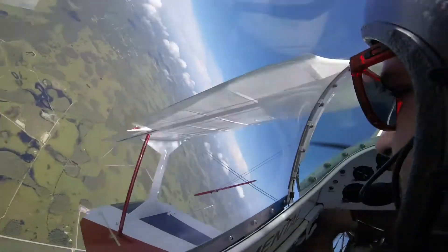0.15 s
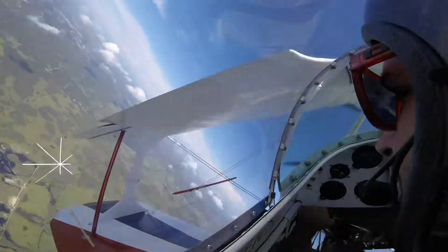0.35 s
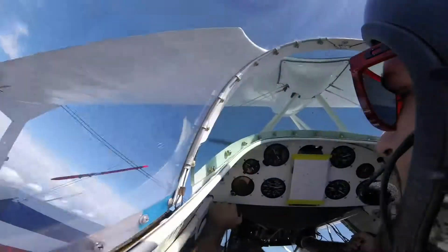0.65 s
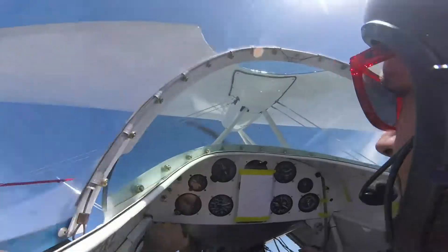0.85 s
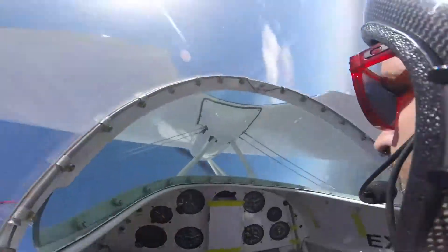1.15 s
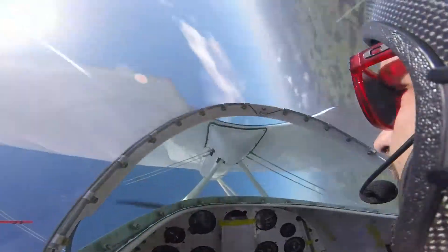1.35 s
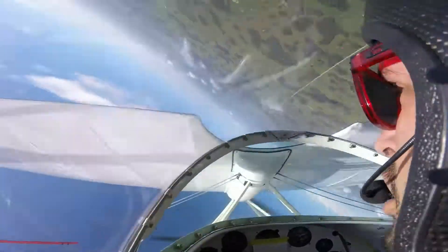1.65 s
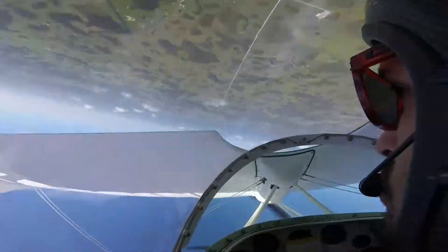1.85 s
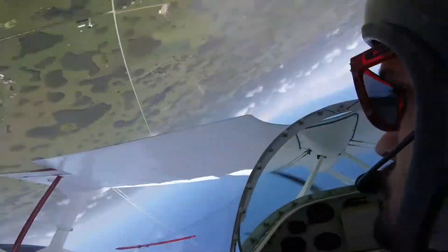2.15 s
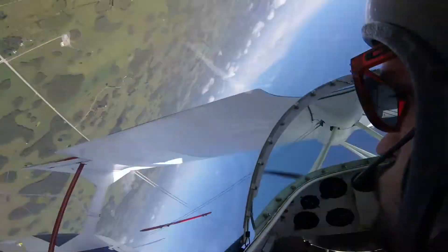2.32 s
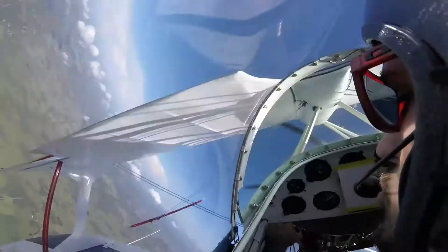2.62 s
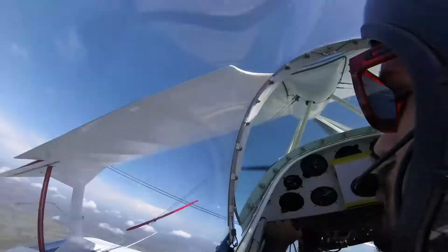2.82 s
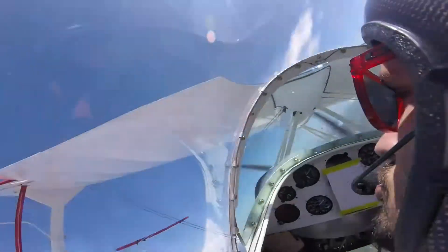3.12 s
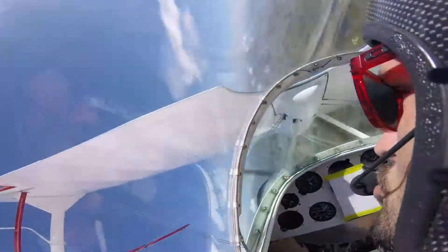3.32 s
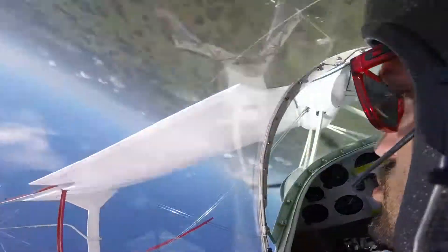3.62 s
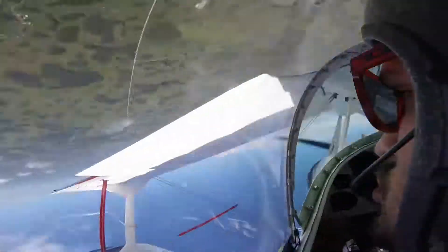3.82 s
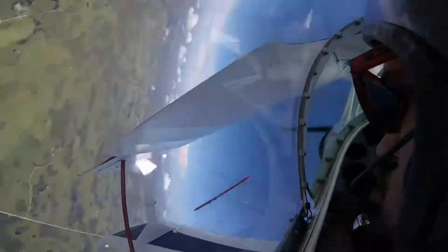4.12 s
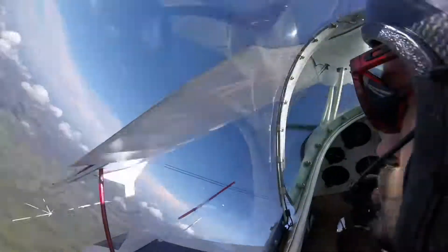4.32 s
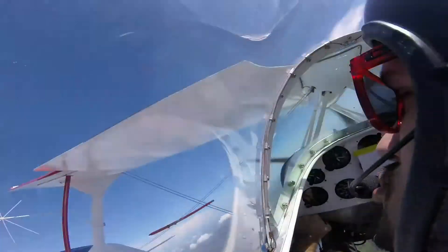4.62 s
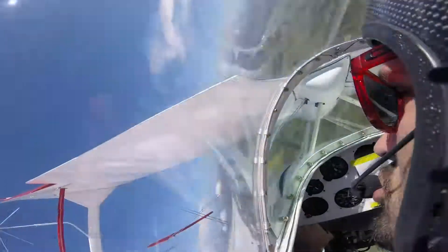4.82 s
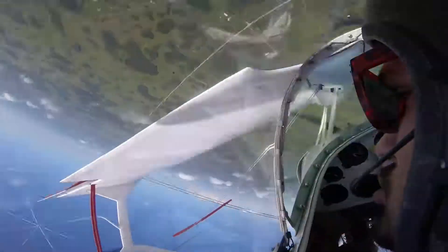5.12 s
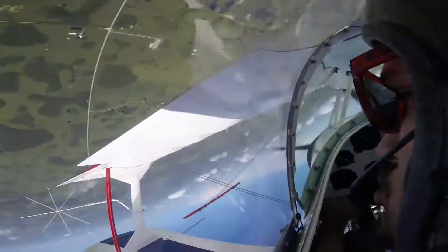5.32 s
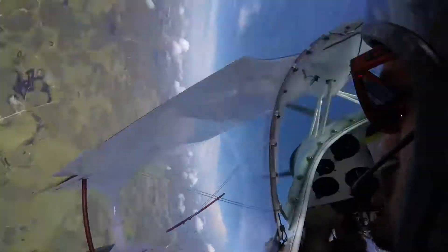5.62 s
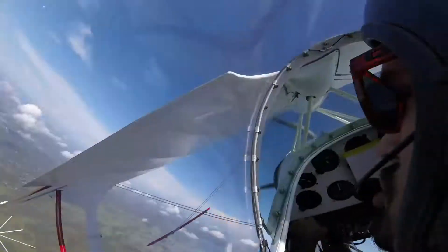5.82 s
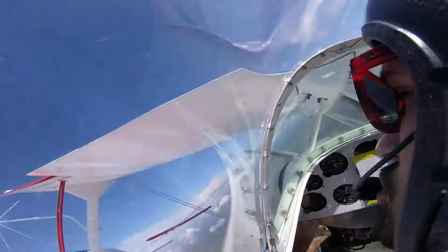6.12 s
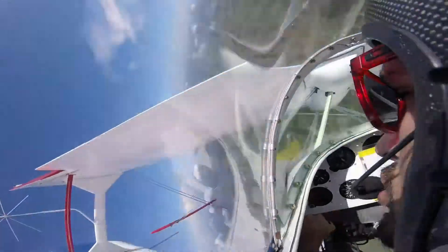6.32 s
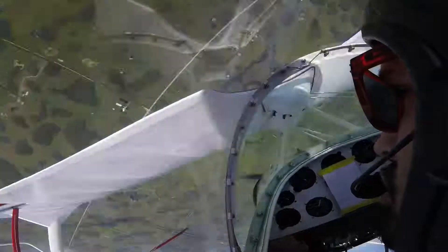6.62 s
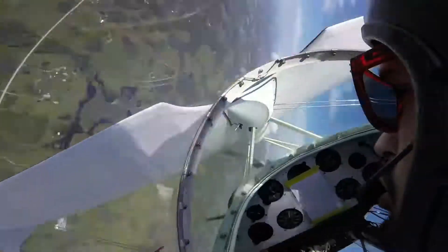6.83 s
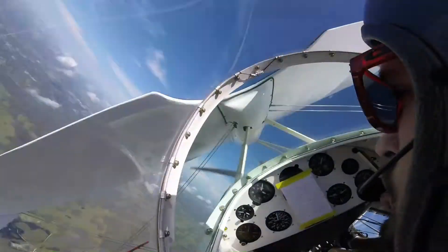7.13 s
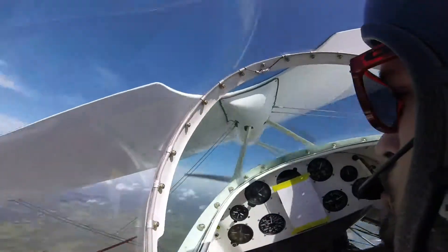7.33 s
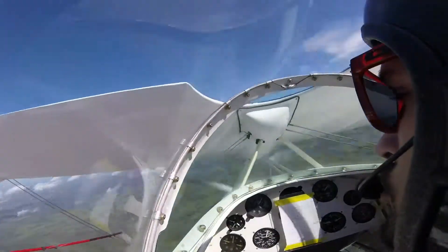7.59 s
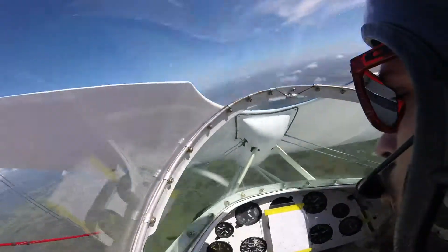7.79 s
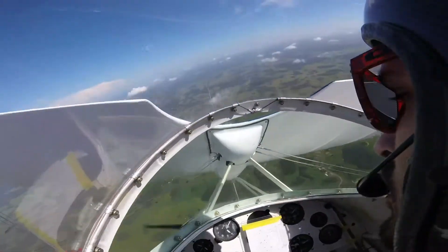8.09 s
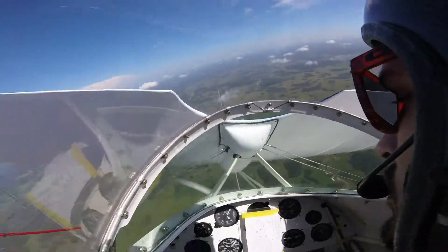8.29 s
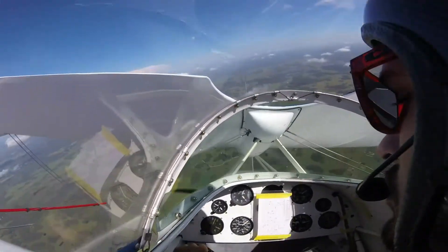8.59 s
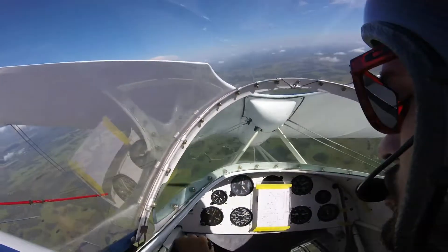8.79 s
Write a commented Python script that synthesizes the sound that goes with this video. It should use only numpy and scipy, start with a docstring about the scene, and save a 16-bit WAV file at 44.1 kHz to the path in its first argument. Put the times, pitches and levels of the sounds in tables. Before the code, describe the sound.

Inside the closed cockpit of an aerobatic aeroplane, a close, throbbing propeller engine drone sits over rushing slipstream and a low turbulence rumble. A brief gap of total silence interrupts it near the start. The engine pitch sinks gradually, swings up and down through the rolls, then rises slightly. Soft airy whistles come and go around the canopy, and its panels ring faintly in the gusts.

```python
"""A four-cylinder engine and its two-blade propeller drone, heard inside the closed cockpit of a small
aerobatic biplane tumbling through rolls. The pitch sags and recovers with the load, and uneven firings
growl in the cabin. Behind them the slipstream rushes over the canopy, rings its panels and whistles in
the gaps, while turbulence rumbles through the airframe. Early on, all sound drops out for a moment."""
import sys
import numpy as np
from scipy import signal
from scipy.fft import rfft, irfft, next_fast_len
from scipy.io import wavfile

SR = 44100
rng = np.random.default_rng(int(sys.argv[2]) if len(sys.argv) > 2 else 0)


def output_pcm(signal):
    """Save a mono or channel-first signal as 16-bit PCM at the path in sys.argv[1].

    Samples are clipped to [-1, 1] before scaling.
    """
    pcm = np.clip(np.atleast_2d(signal).T, -1, 1) * 32767
    wavfile.write(sys.argv[1], SR, np.round(pcm).astype(np.int16))


N = 394694
TIME = np.arange(N) / SR


def from_db(db):
    """Decibels to gain."""
    return 10 ** (np.asarray(db) / 20)


def rms_one(x):
    """Scale to rms 1."""
    return x / np.sqrt(np.mean(x ** 2) + 1e-20)


def in_time(rows):
    """One automation curve for each column after time_s."""
    time_s, *columns = np.transpose(rows)
    return [np.interp(TIME, time_s, column) for column in columns]


def at_hz(points, hz):
    """Read an EQ curve on a log-frequency axis."""
    knots, level = np.transpose(points)
    return np.interp(np.log(np.maximum(hz, 1)), np.log(knots), level)


def drift(rate_hz, step=100):
    """Slow random modulation, rms 1: coarse noise through a double low-pass."""
    r = np.exp(-2 * np.pi * rate_hz * step / SR)
    coarse = rng.standard_normal(2 * (N // step + 2))
    slow = signal.lfilter([1], [1, -2 * r, r * r], coarse)[N // step:]
    return np.interp(np.arange(N) / step, np.arange(len(slow)), rms_one(slow))


def noise(colour):
    """Noise shaped by an EQ curve, rms 1."""
    size = next_fast_len(N, real=True)
    gain = from_db(at_hz(colour, np.fft.rfftfreq(size, 1 / SR)))
    return rms_one(irfft(rfft(rng.standard_normal(size)) * gain, size)[:N])


def resonance(x, hz, width_hz):
    """A band-pass with gain 1 at its peak."""
    r = np.exp(-np.pi * width_hz / SR)
    poles = [1, -2 * r * np.cos(2 * np.pi * hz / SR), r * r]
    return signal.lfilter(np.array([1, 0, -1]) * (1 - r * r) / 2, poles, x)


def singing_air(hz, width_hz):
    """A breathy pitch: turbulence twice through one resonance, rms 1."""
    once = resonance(rng.standard_normal(N), hz, width_hz)
    return rms_one(resonance(once, hz, width_hz))


def tone(turns):
    """A sine of rms 1."""
    return np.sqrt(2) * np.cos((2 * np.pi * (turns % 1)).astype(np.float32))


def chuff(firings, depth_db, lope_db):
    """Tremolo at each firing, with a lope once per four-firing engine cycle."""
    return rms_one(from_db(depth_db * tone(firings) + lope_db * tone(firings / 4)))


# turbulence shaking the airframe: time_s, level_db
BUFFET = [(0, -32.5), (1.3, -39.5), (2.2, -42), (2.8, -32.5), (3.4, -29.5), (4.3, -24.5), (4.62, -39.5),
          (5.7, -27), (6.25, -40.5), (7.3, -25), (7.75, -38), (8.95, -45)]
# EQ of the fuselage rumble and of the cabin boom: freq_hz, gain_db
RUMBLE_EQ = [(12, -18.5), (25, -7), (38, 0.5), (60, 0), (100, -5.5), (200, -16), (400, -32.5), (800, -70)]
BOOM_EQ = [(40, -24), (80, -0.5), (120, 0), (160, 5), (200, -0.5), (270, -1.5), (340, -13), (500, -28.5),
           (1000, -55)]

def airframe(boom_db=-28.0, follow=0.33):
    """The low bed: buffeting rumbles through the fuselage and makes the cabin air boom."""
    buffet_db, = in_time(BUFFET)
    boom = from_db(boom_db + follow * (buffet_db - buffet_db.mean())) * noise(BOOM_EQ)
    return from_db(buffet_db) * noise(RUMBLE_EQ) + boom


# air across edges and gaps: centre_s, half_length_s, pitch_hz, level_db
WHISTLES = [(.22, 0.19, 550, -33.5), (0.247, 0.33, 905, -38), (.28, 0.2, 3950, -44), (.95, .35, 740, -35),
            (1.1, 0.26, 2660, -44), (2.304, 0.19, 1420, -41.5), (6.1, 0.43, 2300, -43.5),
            (7.18, 0.38, 1530, -44), (7.851, 0.16, 642.4, -37.5), (8.263, .12, 2590, -39),
            (8.747, 0.4, 742, -36.5)]

def whistles(width_share=0.046):
    """Breathy whistles come and go as the airflow changes angle; the higher, the broader."""
    return sum(from_db(db) * np.exp(-((TIME - centre_s) / half_s) ** 4)
               * singing_air(hz, width_share * hz) for centre_s, half_s, hz, db in WHISTLES)


# side-on airflow during the rolls: time_s, amount_0_to_1
TUMBLE = [(0, 0.03), (2.4, 0), (3.6, 0.5), (4.1, 1), (6.4, 1), (6.9, 0), (7.6, 0.11), (8.95, 0.15)]

def tumble():
    """How much of the air strikes from the side."""
    return in_time(TUMBLE)[0]


# canopy and panel resonances: pitch_hz, base_width_hz, relative_level_db, tumble_boost_db
PANELS = [(935, 50, -12, 5.5), (1235, 96, -17.5, 14), (1438, 74, -12, 2), (1766, 60, -23, 13),
          (2160, 140, -12, 3), (2406, 75, -16.5, 6.5), (2860, 140, -14, -3.5), (3330, 43, -21.5, 5.5),
          (3870, 430, -21, -3.5)]

def panels(rush_db, gust_db=2.0):
    """The slipstream rings canopy and panels in gusts, most of them harder from the side."""
    side_on = tumble()
    return sum(from_db(rush_db + db + boost_db * side_on + gust_db * (drift(13) - 1.15))
               * singing_air(hz, 1.2 * width) for hz, width, db, boost_db in PANELS)


# air singing through the canopy seal: pitch_hz, base_width_hz, level_against_hiss_db
SEAL = (6455, 240, -6)
# EQ of the airy top end: freq_hz, gain_db
HISS_EQ = [(2000, -33), (3800, -2.5), (4700, 2), (5400, 0), (6100, -2.5), (7000, -5.5), (8000, -9),
           (9000, -13), (10000, -21), (11200, -19), (12200, -33), (14000, -45)]

def hiss(hiss_db, side_on_db=-1.3):
    """The broad hiss sinks when the air comes from the side; the canopy seal keeps singing."""
    seal_hz, width_hz, seal_db = SEAL
    seal = from_db(seal_db) * singing_air(seal_hz, 2 * width_hz)
    broad = from_db(side_on_db * tumble()) * noise(HISS_EQ)
    return from_db(hiss_db + 0.07) * (broad + seal)


# EQ of the midrange rush and of the brighter air on the canopy: freq_hz, gain_db
RUSH_EQ = [(400, -35.5), (850, -9.5), (1050, -3), (1350, -2), (1550, 0.5), (1950, -1), (2350, -4.5),
           (2700, -9), (3500, -30), (8000, -62)]
CANOPY_EQ = [(1200, -37), (2200, -2), (2600, 1), (3100, 0), (3900, -1.5), (4500, -10.5), (5500, -35.5),
             (12000, -68)]

def slipstream(firings, load_db, canopy_db, hiss_db, follow_load=0.49, follow_airflow=0.46):
    """Propeller wash on the canopy rides load and airflow, and beats with the engine."""
    rush_db = -33.5 + follow_load * load_db + follow_airflow * (canopy_db - canopy_db.mean())
    rush = from_db(rush_db - 2.5) * noise(RUSH_EQ) + panels(rush_db)
    canopy = from_db(canopy_db - 0.5) * noise(CANOPY_EQ)
    air = rush + canopy + hiss(hiss_db)
    flutter = from_db(0.56 * drift(25))
    return air * flutter * chuff(firings, depth_db=0.73, lope_db=0.5)


# EQ of the exhaust: freq_hz, gain_db
ROAR_EQ = [(150, -28), (300, -8), (400, 2), (520, -2), (700, -2.5), (900, -10), (1200, -8.5), (2200, -42.5),
           (4000, -68.5)]

def exhaust(firings, roar_db):
    """A noisy exhaust roar that pulses faintly with the firings."""
    gain = from_db(roar_db - 1.5 + 1.1 * drift(14))
    return gain * noise(ROAR_EQ) * chuff(firings, depth_db=0.2, lope_db=-0.04)


# weaker engine orders: firing_multiple, base_level_db, wobble_db
WEAK_ORDERS = [(.5, -44.5, -3.5), (1.25, -37.5, 3.5), (1.5, -36, 3), (1.75, -41.5, 7.5), (2.25, -41.5, -1),
               (2.5, -35.5, 0.5), (2.75, -48, 3.5), (3.25, -39.5, 4.5), (4.5, -45.5, -2.5), (5.5, -48.5, 6),
               (6, -41.5, 2)]

def throb(firings, load_db, follow=0.82, wander_turns=0.044):
    """Unequal cylinders repeat every four firings and put tones between the harmonics."""
    out = 0
    for multiple, db, wobble_db in WEAK_ORDERS:
        push_db = follow * load_db * min(multiple / 4, 1)
        gain = from_db(db + wobble_db * (drift(1.4) - 1.13) + push_db)
        out += gain * tone(multiple * firings + rng.random() + wander_turns * drift(5.2))
    return out


# cabin response to the higher orders: freq_hz, base_level_db
GROWL_EQ = [(330, -44.5), (450, -50.5), (560, -48), (650, -47.5), (730, -47), (830, -49), (920, -51.5),
            (1100, -56.5), (1220, -52), (1500, -54)]

def growl(firings, firing_hz, load_db, follow=1.22, db_per_hz=0.14, wobble_db=3.5, wander_turns=0.1):
    """High quarter orders slide through the cabin's resonances, rising with load and propeller speed."""
    taken = [5] + [row[0] for row in WEAK_ORDERS]  # overtones() and throb() play these
    out = 0
    for multiple in np.setdiff1d(np.arange(17, 60) / 4, taken):
        # half orders sit 2 dB down, quarter orders 4 dB
        cut_db = 2 * (multiple % 1 > 0) + 2 * (2 * multiple % 1 > 0)
        gain = from_db(at_hz(GROWL_EQ, multiple * firing_hz) - cut_db + wobble_db * drift(1.0))
        out += gain * tone(multiple * firings + rng.random() + wander_turns * drift(5.5))
    tip_speed_db = db_per_hz * (firing_hz - firing_hz.mean())
    return out * from_db(follow * load_db + tip_speed_db)


# cabin air modes: pitch_hz, width_hz, peak_db
CABIN_MODES = [(231, 10, -32.5), (241.6, 11, -27.5), (253.7, 13.6, -25.5), (268.3, 33, -31), (314, 11, -31),
               (332.4, 12, -30.5), (388.2, 16, -37.5), (411.2, 8, -27), (433, 9, -32)]

def cabin(hz):
    """Gain of an overtone at this pitch: high on a cabin mode, low between them."""
    return np.sqrt(sum(from_db(2 * db) / (1 + (2 * (hz - centre) / width) ** 2) ** 2
                       for centre, width, db in CABIN_MODES))


def overtones(firings, firing_hz, load_db, trim_db=-1.1, wobble_db=2.0, follow=0.3, side_on_db=-1.0):
    """Strong overtones swell as they glide through the cabin modes, and roughen in the tumble."""
    side_on = tumble()
    db = trim_db + follow * load_db + side_on_db * side_on
    wander_turns = 0.04 + 0.086 * side_on
    return sum(cabin(multiple * firing_hz) * from_db(db + wobble_db * drift(5))
               * tone(multiple * firings + rng.random() + wander_turns * drift(14))
               for multiple in (3.5, 4, 5))


def swelling(rows):
    """A fader ride in linear gain, so swells are broad and nulls sharp."""
    time_s, db = np.transpose(rows)
    return np.interp(TIME, time_s, from_db(db))


# the firing tone and its octave swell and cancel as the aircraft turns: time_s, level_db
FIRING_TONE = [(0, -17.5), (1.3, -14.5), (2.6, -18.5), (3.1, -21), (3.66, -21), (3.82, -41), (4.02, -18),
               (4.45, -13.5), (4.88, -24), (5.38, -25), (5.92, -14), (6.36, -19.5), (6.56, -40), (6.9, -14),
               (7.5, -17.5), (7.76, -34), (8.0, -47), (8.42, -20.5), (8.95, -20)]
OCTAVE_TONE = [(0, -24.5), (2.1, -19), (2.5, -21.5), (2.75, -16.5), (3.25, -22), (3.48, -16), (4.25, -15.5),
               (4.65, -25.5), (4.88, -16), (5.55, -15.5), (6.28, -27), (6.45, -16), (6.8, -14.5),
               (7.02, -20), (7.58, -18), (7.71, -45), (7.9, -17.5), (8.95, -18.5)]

def drone(firings, firing_hz, lag_turns=0.2):
    """The lead: three low harmonics, lagged to give each pressure pulse a slow rise and a quick fall."""
    fundamental = swelling(FIRING_TONE) * from_db(0.5 * drift(7.7))
    octave = swelling(OCTAVE_TONE) * from_db(0.7 * drift(9.3))
    third = cabin(3 * firing_hz) * from_db(1.0 + 1.3 * drift(5.2))
    return sum(gain * tone((k + 1) * firings - lag_turns * k)
               for k, gain in enumerate((fundamental, octave, third)))


# engine speed, sagging in the climb and swinging with each roll: time_s, firing_hz
ENGINE_SPEED = [(0, 89.93), (1.2, 85.55), (1.85, 83.97), (2.25, 83.1), (2.6, 82.1), (2.95, 80.32),
                (3.5, 79.2), (4.25, 75.26), (4.5, 75.1), (5.02, 77.86), (5.8, 74.3), (6.4, 77.4),
                (6.72, 77.57), (7.05, 75.6), (7.5, 74.67), (8.0, 77.47), (8.5, 78.35), (8.95, 80.9)]
# fader rides for load and airflow, before each layer's trim: time_s, roar_db, canopy_db, hiss_db
LOAD_AND_AIRFLOW = [(0, -29, -30, -40), (.3, -27.5, -32.5, -41), (.7, -31.5, -34.5, -40),
                    (1.45, -30.5, -36, -39.8), (2.3, -28.5, -35.5, -39.5), (2.8, -30.5, -38.5, -41.5),
                    (3.75, -28.5, -39, -40.3), (4.2, -30.5, -38.5, -41.5), (4.5, -32.5, -40, -45.3),
                    (4.95, -32, -41, -44), (5.8, -31.5, -38, -45.5), (5.98, -33.5, -40.5, -47),
                    (6.25, -29.5, -39, -46), (6.68, -30.5, -36.5, -44), (6.98, -36, -38, -47.5),
                    (7.45, -36, -39, -46), (7.85, -30.5, -37, -43.5), (8.2, -33.5, -35.5, -43),
                    (8.95, -30.5, -35.5, -39.5)]

def scene():
    """The mono mix: one crankshaft times the engine tones and the pulsing of the air."""
    firing_hz, = in_time(ENGINE_SPEED)
    firings = np.cumsum(firing_hz * (1 + 0.00092 * drift(5.8))) / SR
    roar_db, canopy_db, hiss_db = in_time(LOAD_AND_AIRFLOW)
    load_db = roar_db - roar_db.mean()
    engine = growl(firings, firing_hz, load_db) + drone(firings, firing_hz)
    engine += overtones(firings, firing_hz, load_db) + throb(firings, load_db)
    engine += exhaust(firings, roar_db)
    air = slipstream(firings, load_db, canopy_db, hiss_db) + whistles()
    return (engine + air + airframe())[None]


# a moment of silence: start_s, end_s, fade_in_s
DROPOUT = (1.469, 1.804, .013)

def record(dry, ceiling=0.53, cutoff_hz=14600):
    """The master chain: soft-clip the peaks, mute briefly and fade back in, then low-pass steeply."""
    rounded = dry / (1 + (dry / ceiling) ** 8) ** (1 / 8)
    start_s, end_s, fade_in_s = DROPOUT
    gate = np.where(TIME < start_s, 1, np.clip((TIME - end_s) / fade_in_s, 0, 1))
    low_pass = signal.cheby2(12, 70, cutoff_hz, fs=SR, output="sos")
    return signal.sosfilt(low_pass, rounded * gate + 1e-12)


dry = scene()
out = record(dry)
output_pcm(out)
```